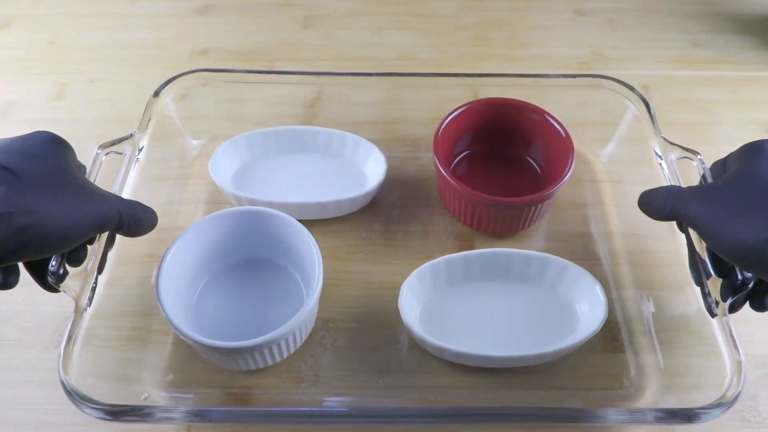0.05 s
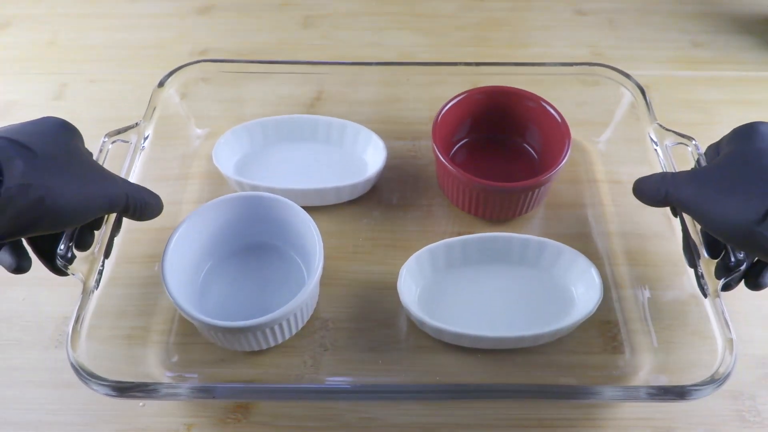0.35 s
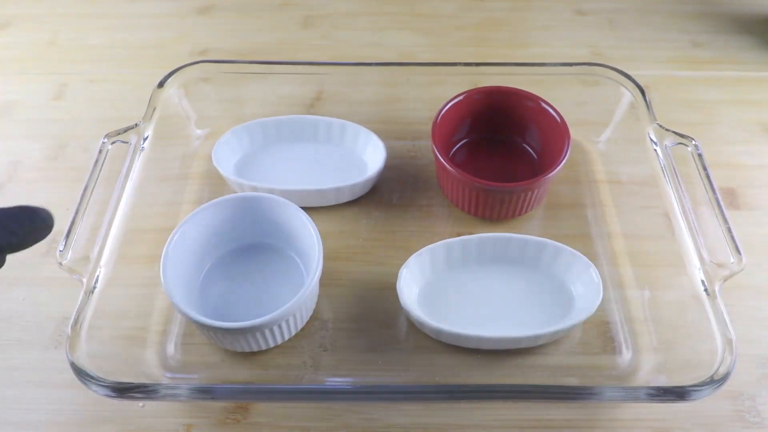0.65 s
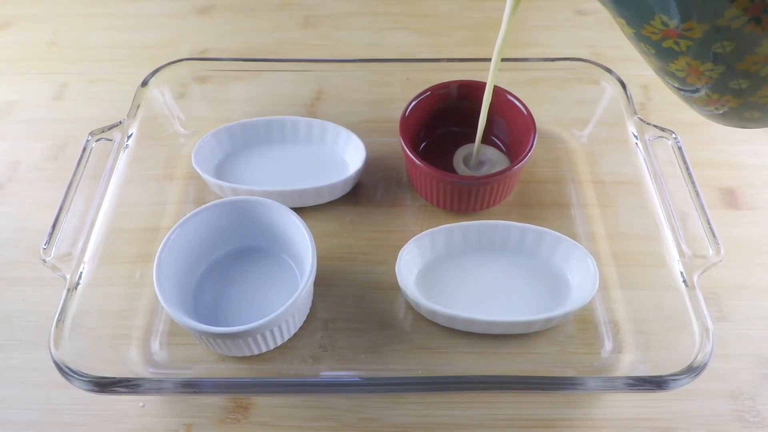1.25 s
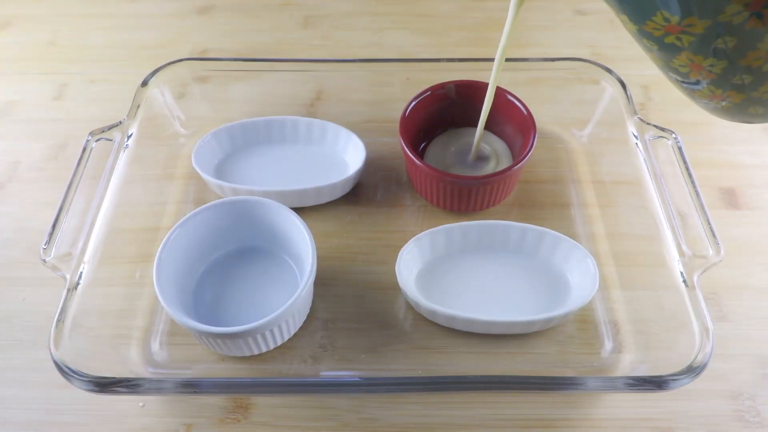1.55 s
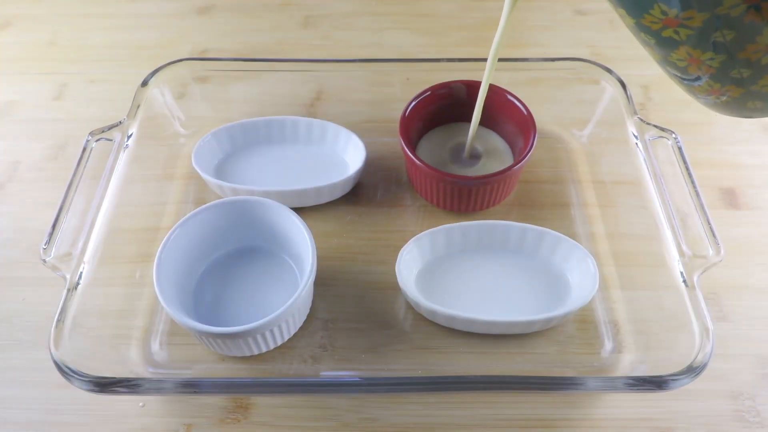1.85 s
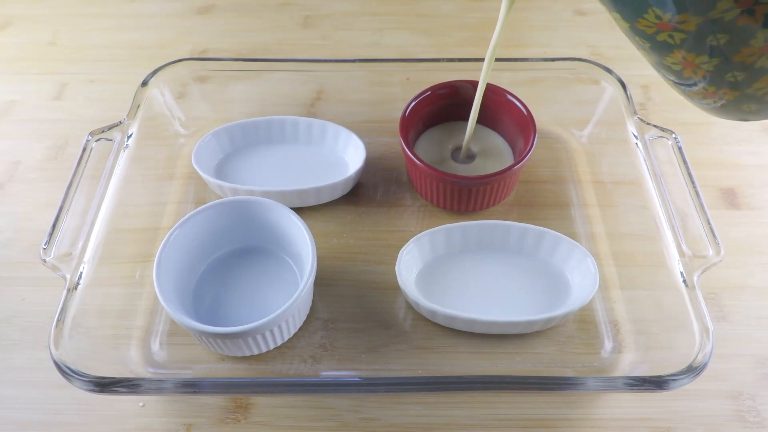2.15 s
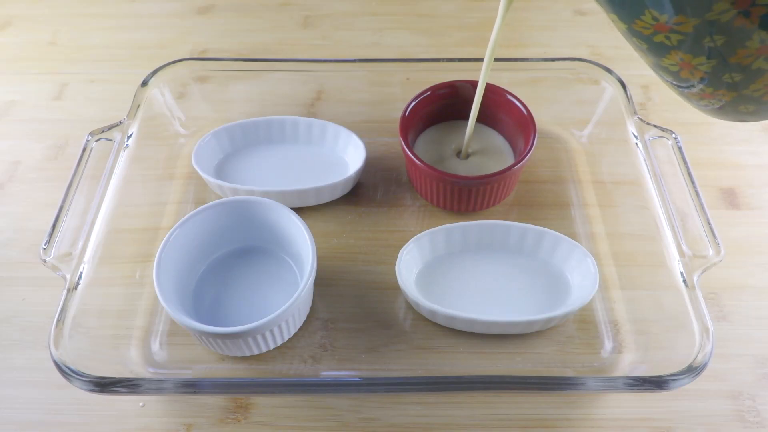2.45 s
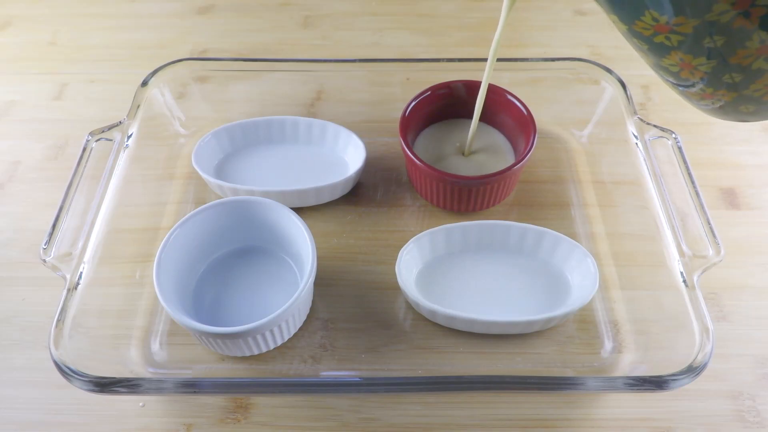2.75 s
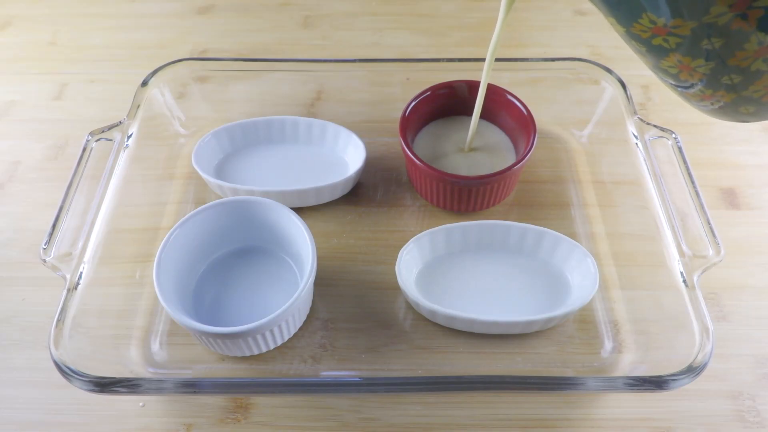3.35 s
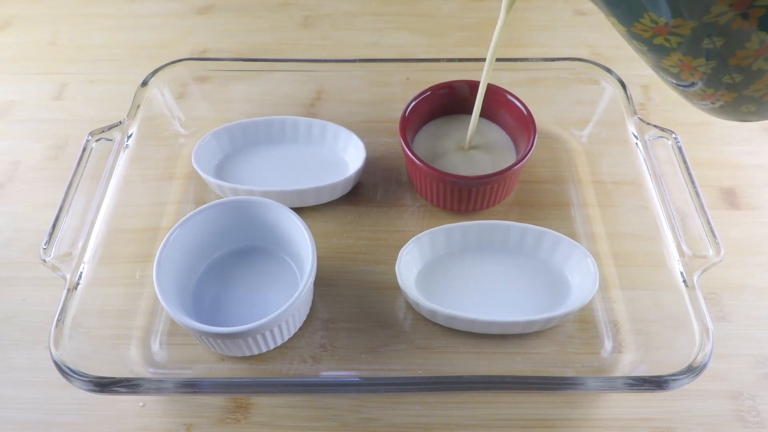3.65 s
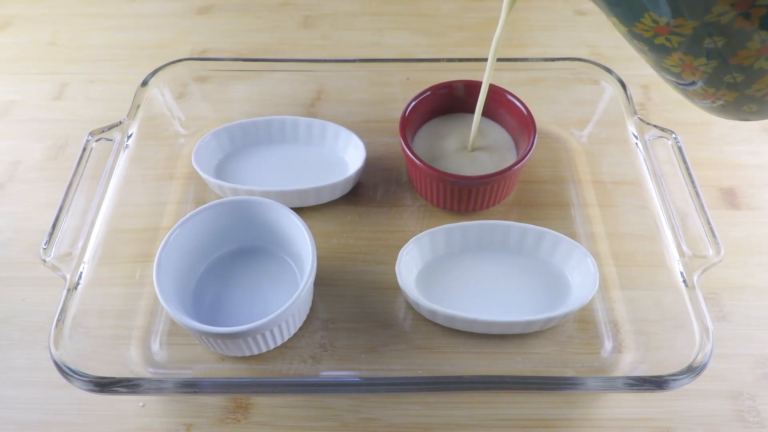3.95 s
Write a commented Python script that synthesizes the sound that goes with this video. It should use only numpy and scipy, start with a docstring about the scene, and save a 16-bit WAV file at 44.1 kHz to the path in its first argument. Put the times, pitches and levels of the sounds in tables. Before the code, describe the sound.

A glass baking dish scrapes and bumps across a wooden top, ringing as ceramic cups chatter inside. After a fainter rub, a drop of custard ticks into a cup and a thin stream pours almost silently over low kitchen hum.

```python
"""In a kitchen, a glass baking dish holding ceramic ramekins (small cups) is pushed across a wooden top.
It scrapes, bumps and rings while the cups chatter inside; a fainter rub follows as the hands let go.
The first drop of custard ticks into a cup, and a thin stream runs in almost silently.
Behind it all are moving air, a light hiss and the slowly throbbing hum of kitchen motors."""
import sys
import numpy as np
from scipy import signal
from scipy.fft import rfft, irfft
from scipy.io import wavfile
from scipy.ndimage import uniform_filter1d

SR = 44100
rng = np.random.default_rng(int(sys.argv[2]) if len(sys.argv) > 2 else 0)


def bounce(signal):
    """Save signal as a 16-bit WAV file at the path given by the first command-line argument."""
    frames = np.transpose(np.atleast_2d(signal))
    limited = np.clip(frames, -1, 1)
    pcm = np.round(limited * 32767).astype(np.int16)
    wavfile.write(sys.argv[1], SR, pcm)


N = 176400
T = np.arange(N) / SR
TOP_HZ = 15700


def amp(db):
    """Turn decibels into a number to multiply by."""
    return 10 ** (np.asarray(db) / 20)


def unit(x):
    """Scale to an average strength (rms) of 1."""
    return x / np.sqrt(np.mean(x ** 2) + 1e-30)


def curve(rows, column=1):
    """Follow a table of levels over time; silent outside it."""
    rows = np.array(rows)
    return amp(np.interp(T, rows[:, 0], rows[:, column], left=-150, right=-150))


def colour(x, points):
    """Make some pitches stronger and others weaker, following a table."""
    hz, db = np.array(points).T
    f = np.maximum(np.arange(N // 2 + 1) * SR / N, 1)
    roll_off = np.minimum(f / hz[0], 1) ** 2 * np.minimum(hz[-1] / f, 1) ** 2
    gain = amp(np.interp(np.log(f), np.log(hz), db))
    return unit(irfft(rfft(x) * roll_off * gain, N))


def band(x, lo_hz, hi_hz, order=2):
    """Keep what lies between two pitches, at strength 1."""
    sos = signal.butter(order, [lo_hz, min(hi_hz, SR / 2 - 1)], "band", fs=SR, output="sos")
    return unit(signal.sosfilt(sos, x))


def fade(t, t60):
    """Die away by 60 dB in t60 seconds, the fade time."""
    return np.exp(-np.log(1000) * t / t60)


def ring(x, hz, t60):
    """One fading note, set ringing by x."""
    pole = np.exp(2j * np.pi * hz / SR) * fade(1 / SR, t60)
    return unit(signal.lfilter([1], [1, -pole], x).imag)


def clicks(per_s, scatter_db):
    """Tiny random hits of uneven size."""
    hit = rng.random(N) < per_s / SR
    return unit(hit * rng.choice([-1, 1], N) * amp(scatter_db * np.clip(rng.standard_normal(N), -2, 2)))


def add(out, start, sound, db):
    """Mix in a short sound with its peak at db."""
    i = max(int(start * SR), 0)
    out[i:i + len(sound)] += (amp(db) * sound / np.abs(sound).max())[:N - i]


# other notes in the hum: f/Hz, level/dB
HUM_NOTES = [(191.8, -80.5), (296.6, -67), (303.5, -76), (335.8, -92), (383.8, -71), (415.3, -75.5),
             (488.5, -80.5)]

def motors():
    """Two motors of nearly equal pitch drift in and out of step, so their hum throbs."""
    motor_hz, throb_hz = 239.85, 2.54
    since_peak = T - 2.18
    hum = amp(-66.5) * unit(np.cos(2 * np.pi * motor_hz * since_peak))
    hum += amp(-65.5) * unit(np.cos(2 * np.pi * (motor_hz - throb_hz) * since_peak))
    for hz, db in HUM_NOTES:
        waver_db = 0.15 * band(rng.standard_normal(N), 0.33, 5.3, order=1)
        hum += amp(db + waver_db) * unit(np.sin(2 * np.pi * (hz * T + rng.random())))
    return hum


# tone of the air shared by both ears: f/Hz, relative level/dB
AIR_COLOUR = [(25, -27), (60, -14), (110, -14), (160, -11), (210, -2.5), (270, -3), (340, -2), (390, -0.5),
              (450, -2), (520, -8.5), (570, -4.5), (750, -10), (950, -10), (1300, -13.5), (1650, -13.5),
              (2500, -19.5), (3500, -16), (5000, -22.5), (10000, -25), (15500, -27.5)]
# tone of the air that differs between the ears: f/Hz, relative level/dB
AIR_SIDE_COLOUR = [(24, -41), (40, -19), (150, -5), (197, -15), (287, -6), (621, -5), (5050, -6),
                   (15500, -10)]
# tone of the hiss: f/Hz, relative level/dB
HISS_COLOUR = [(3000, -18), (6000, -17), (10000, -5), (15500, -12.5)]
# loudness of the hiss: t/s, level/dB
HISS_LEVELS = [(0, -90), (0.75, -81), (1.2, -73), (2.1, -74), (2.55, -71), (2.9, -81), (4.0, -77)]

def air():
    """Moving air makes a steady rush, while a fine hiss swells and sinks."""
    middle = amp(-61) * colour(rng.standard_normal(N), AIR_COLOUR)
    side = amp(-69.5) * colour(rng.standard_normal(N), AIR_SIDE_COLOUR)
    hiss = np.array([colour(rng.standard_normal(N), HISS_COLOUR) for _ in range(2)])
    return middle + np.array([side, -side]) + hiss * curve(HISS_LEVELS)


# notes the dish and cups ring at: f/Hz, relative level/dB, fade time/s
DISH_NOTES = [(233.4, 7.5, 1), (331, -4, .2), (390.8, -5, 0.19), (937, -6.5, 0.053), (1483, -6, 0.47),
              (1783, -14, 0.21), (2410, 3.5, 0.21), (2750, -8.5, 0.25), (3156, -1, 0.15),
              (3345, -1.5, 0.22), (4120, 0.5, 0.21), (4764, -1.5, 0.1)]
# tone of glass on wood: f/Hz, relative level/dB
SCRAPE_COLOUR = [(30, -14), (75, -21), (115, -11), (150, -3), (240, -3.5), (380, 3.5), (480, 1),
                 (700, -8.5), (930, -3.5), (1150, -3.5), (1600, -10.5), (2200, -19), (2700, -22),
                 (3200, -19.5), (4200, -29.5), (5000, -41), (7000, -40), (9000, -44), (11500, -48),
                 (14000, -49)]
# loudness of the scrape: t/s, then relative level/dB of bass, middle, upper middle, treble
SCRAPE_LEVELS = [(0, -27, -31.5, -47, -65), (0.04, -38, -34, -48, -88), (0.075, -40.5, -36.5, -52.5, -77),
                 (0.14, -43.5, -43.5, -55, -69), (0.185, -39, -42.5, -52.5, -70),
                 (0.225, -45, -44.5, -51.5, -62), (0.27, -47.5, -43, -49, -71),
                 (0.315, -45, -49.5, -52, -74), (0.35, -49.5, -53, -55.5, -69), (0.385, -59, -66, -77, -94),
                 (0.42, -84, -85, -90, -100)]

def scrape():
    """Glass catches and slips on wood; each tiny catch rings the dish."""
    catches = clicks(per_s=2000, scatter_db=2.5)
    ringing = sum(amp(db - 9.5) * ring(catches, hz, t60) for hz, db, t60 in DISH_NOTES)
    body = colour(catches + 2 * np.sqrt(1000 / SR) * ringing, SCRAPE_COLOUR)
    bands_hz = [(20, 600), (600, 2000), (2000, 5000), (5000, TOP_HZ)]
    return amp(-4) * sum(band(body, lo, hi, order=4) * curve(SCRAPE_LEVELS, column)
                         for column, (lo, hi) in enumerate(bands_hz, start=1))


# bumps of the dish on the wood: t/s, level/dB, f/Hz, fade time/s
BUMPS = [(0.001, -29.5, 106, 0.051), (0.001, -22.5, 330, 0.071), (0.013, -26, 400, 0.1),
         (0.055, -33, 950, 0.061), (0.097, -40, 112, .06), (0.176, -30.5, 243.4, 0.13),
         (0.261, -39, 439, 0.061), (0.306, -41, 1330, 0.044), (0.353, -40.5, 248, 0.22),
         (0.596, -50, 165, 0.13), (0.705, -56, 115, 0.092)]
# ticks of the cups on the glass: t/s, level/dB, f/Hz
TICKS = [(0.059, -53, 7240), (0.221, -52, 5470), (0.455, -48.5, 4370), (0.525, -46, 2220),
         (0.551, -54, 4000)]

def knocks():
    """Each dull bump on the wood rings the dish; the hard cups add small ticks."""
    out, t = np.zeros(N), T[:SR // 4]
    onset = 1 - np.exp(-t / 0.0005)
    for start, db, hz, t60 in BUMPS:
        thud = np.sin(2 * np.pi * hz * t) + .2 * band(rng.standard_normal(len(t)), hz / 2, hz * 3)
        add(out, start, thud * fade(t, t60) * onset, db)
        glass = sum(amp(note_db) * np.sin(2 * np.pi * (note_hz * t + rng.random())) * fade(t, note_t60)
                    for note_hz, note_db, note_t60 in DISH_NOTES)
        add(out, start, glass * onset, db - 20)
    for start, db, hz in TICKS:
        tick = band(rng.standard_normal(len(t)), hz / 1.25, hz * 1.23)
        add(out, start, tick * fade(t, t60=0.017), db)
    # trim the deep thump from the start of each knock
    return signal.sosfilt(signal.butter(2, 105, "high", fs=SR, output="sos"), out)


# high notes of the glazed cups: f/Hz, relative level/dB, fade time/s
CUP_NOTES = [(5100, -1.5, .03), (5580, 1.5, 0.072), (6400, -4, .05), (6740, -1.5, .08), (7500, 1, 0.09),
             (8900, -0.5, 0.027), (9800, -8, .06), (10900, -9, .08), (11500, -5, .06)]

def chatter():
    """The cups buzz briefly against the glass as the dish slides."""
    peak_s, width_s = .245, 0.078
    contacts = clicks(per_s=1700, scatter_db=0.5)
    swell = amp(-71.5) * np.exp(-((T - peak_s) / width_s) ** 2)
    return swell * sum(amp(db) * ring(contacts, hz, t60) for hz, db, t60 in CUP_NOTES)


# tone of the rub: f/Hz, relative level/dB
RUB_COLOUR = [(60, -18.5), (130, -20), (238, -2.5), (500, -15), (680, -8.5), (970, -17), (1550, -20.5),
              (1900, -27.5), (3300, -29), (5000, -39.5), (9000, -45), (14000, -54)]
# loudness of the rub: t/s, level/dB
RUB_LEVELS = [(0.37, -82), (0.40, -50), (0.425, -61), (0.44, -53), (0.52, -53), (0.58, -59), (0.63, -54),
              (0.725, -61.5), (0.76, -69), (0.83, -84)]
# notes that sing in the rub: start t/s, end t/s, f/Hz, waver/Hz, level/dB
RUB_NOTES = [(0.402, 0.543, 1549, 6.3, -64), (0.43, 0.735, 1160, 8.1, -67), (0.68, 0.735, 2810, 4.2, -71.5)]

def rub():
    """A light rub shudders as it sticks and slips, singing a few wavering notes."""
    shudder_hz, shudder_db, peak_s = 32.6, 4, .447
    out = colour(clicks(per_s=3000, scatter_db=1), RUB_COLOUR) * curve(RUB_LEVELS)
    for start, end, hz, waver_hz, db in RUB_NOTES:
        contact = uniform_filter1d(1. * ((T > start) & (T < end)), size=600)  # soft on and off
        pitch = hz + waver_hz * band(rng.standard_normal(N), 5, 80)
        out += amp(db) * contact * unit(np.sin(2 * np.pi * np.cumsum(pitch) / SR))
    return out * unit(amp(shudder_db * np.cos(2 * np.pi * shudder_hz * (T - peak_s))))


# tone of the stream: f/Hz, relative level/dB
STREAM_COLOUR = [(500, 8), (900, 3), (1700, -2.5), (2500, 1), (3500, 4.5), (5000, -5.5), (10000, -8),
                 (15000, -7)]
# loudness of the stream: t/s, level/dB
STREAM_LEVELS = [(1.05, -100), (1.15, -69), (1.6, -69.5), (2.0, -69), (2.3, -69.5), (2.6, -67), (2.9, -73),
                 (4.0, -74)]
# drops and bursting bubbles: t/s, level/dB, starting f/Hz
DROPS = [(1.1074, -33, 3130), (1.121, -51, 3430), (1.601, -52.5, 3800), (2.360, -61, 3300),
         (2.4928, -52, 1610), (3.049, -61, 3030)]

def custard():
    """The stream is a soft patter of tiny splats; each drop splashes and rings with a rising note."""
    out = colour(clicks(per_s=700, scatter_db=4), STREAM_COLOUR) * curve(STREAM_LEVELS)
    t = T[:SR // 30]
    onset = 1 - np.exp(-t / 0.00056)
    for start, db, hz in DROPS:
        rising_note = np.sin(2 * np.pi * hz * t * (1 + 3.7 * t))
        bubble = rising_note * onset * fade(t, t60=0.0078)
        splash = band(rng.standard_normal(len(t)), 400, 8950, order=1) * fade(t, t60=0.018)
        add(out, start, bubble + 0.061 * splash, db)
    return out


def room(x):
    """Sound bounces around the kitchen in a short, nearly centred echo."""
    echo_db, delay_s, width = -14.5, .004, 0.023
    t = T[:SR // 2]
    tails = rng.standard_normal((2, len(t))) * fade(t, t60=0.27) * (t > delay_s)
    middle, side = (amp(echo_db) * signal.fftconvolve(x, h / np.linalg.norm(h))[:N] for h in tails)
    return x + middle + width * np.array([side, -side])


def scene():
    """The dish, then the pour, in the humming kitchen."""
    return room(scrape() + chatter() + knocks() + rub() + custard()) + motors() + air()


def record(dry):
    """Cut away the very highest treble."""
    return signal.sosfilt(signal.ellip(10, .1, 70, TOP_HZ, fs=SR, output="sos"), dry)


dry = scene()
out = record(dry)
bounce(out)
```